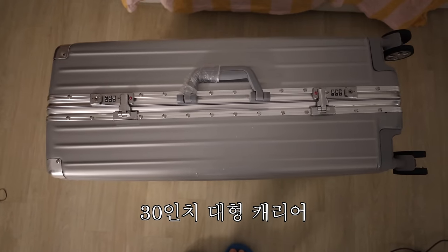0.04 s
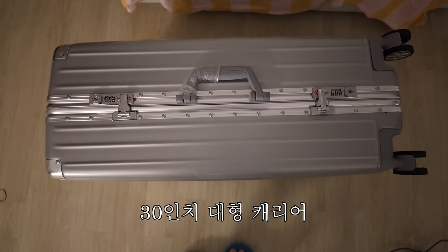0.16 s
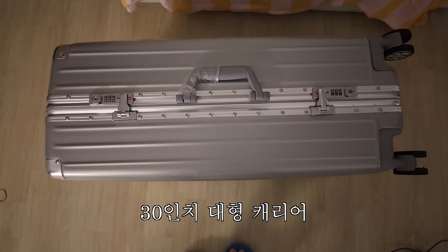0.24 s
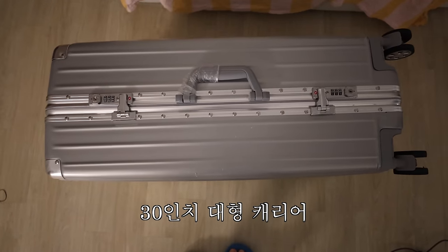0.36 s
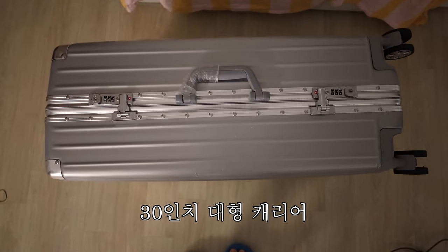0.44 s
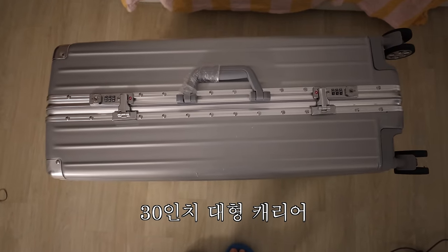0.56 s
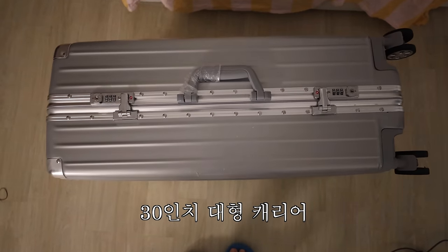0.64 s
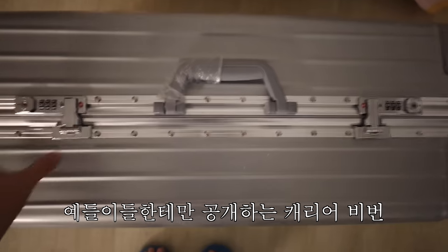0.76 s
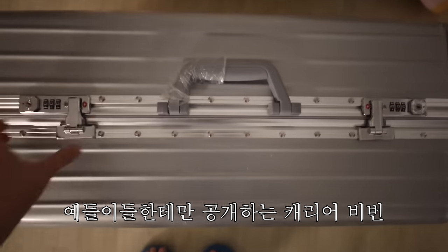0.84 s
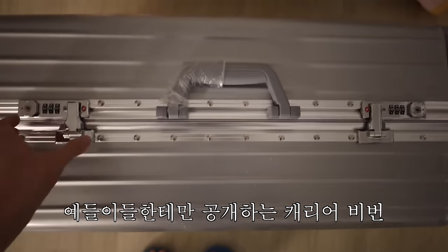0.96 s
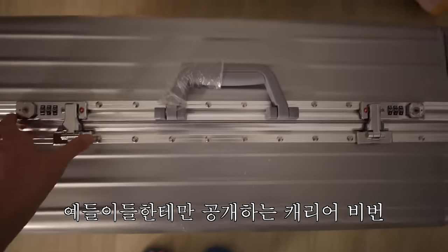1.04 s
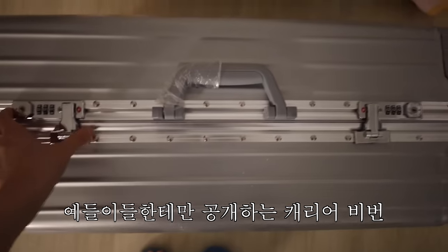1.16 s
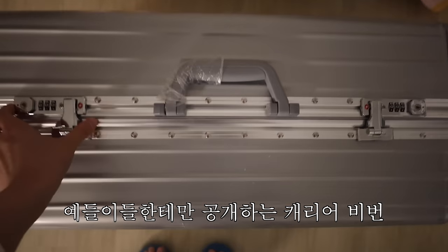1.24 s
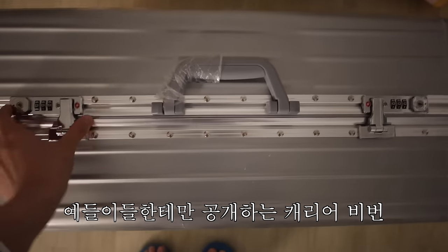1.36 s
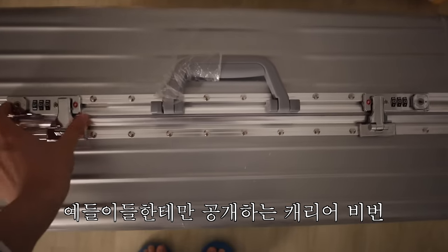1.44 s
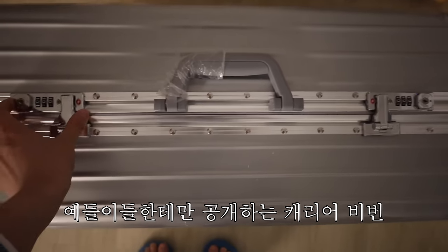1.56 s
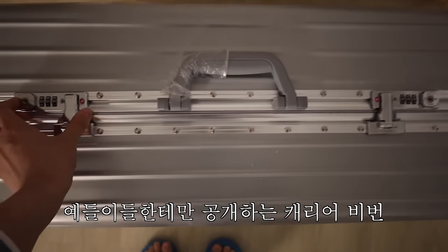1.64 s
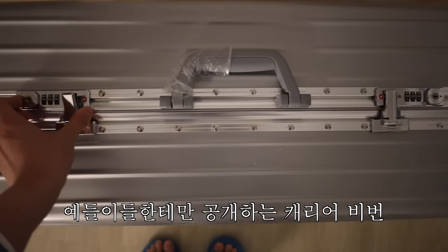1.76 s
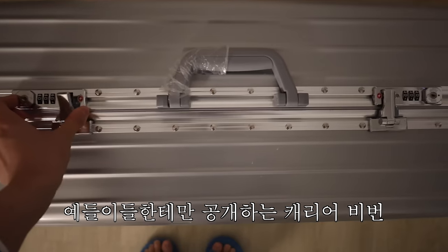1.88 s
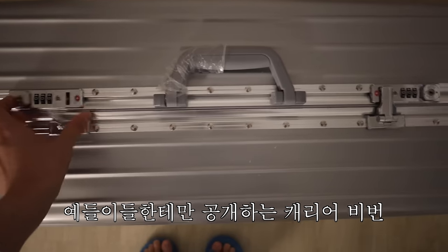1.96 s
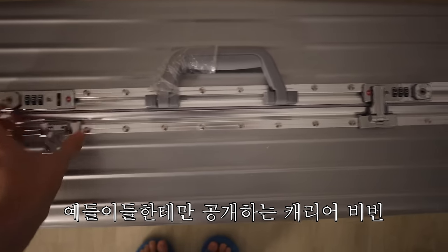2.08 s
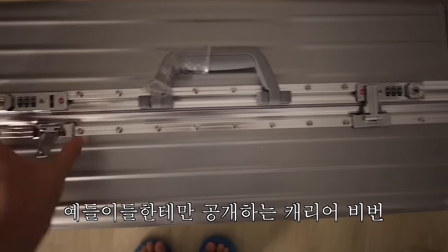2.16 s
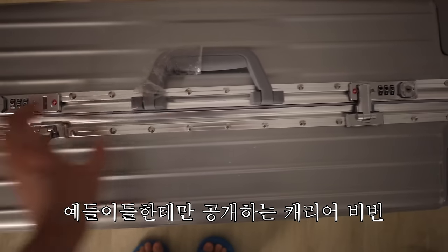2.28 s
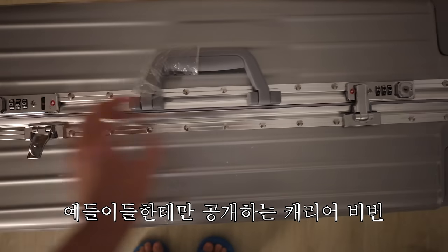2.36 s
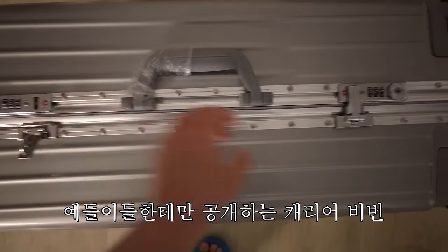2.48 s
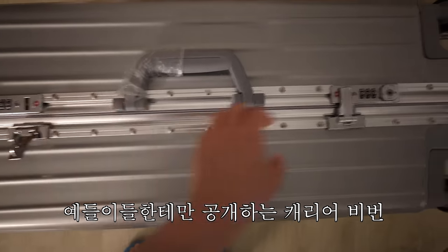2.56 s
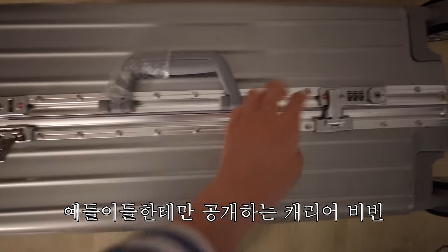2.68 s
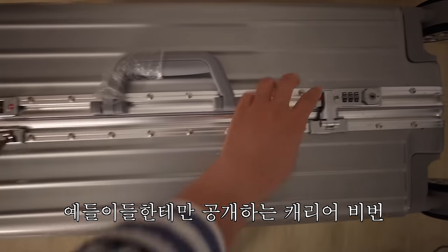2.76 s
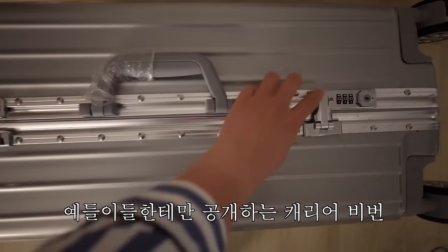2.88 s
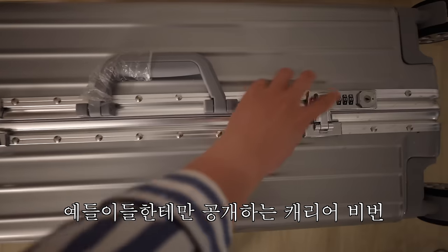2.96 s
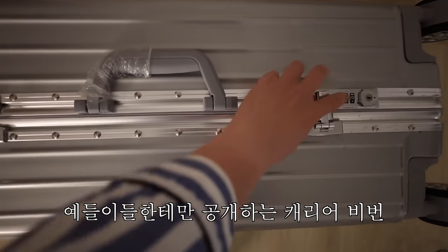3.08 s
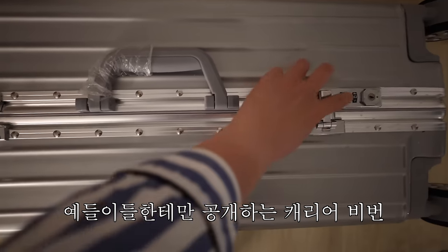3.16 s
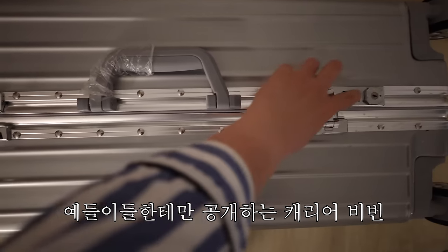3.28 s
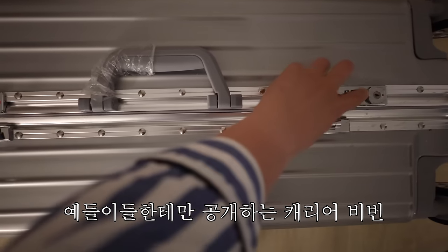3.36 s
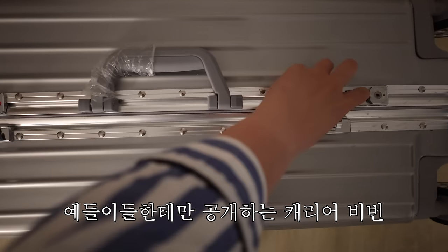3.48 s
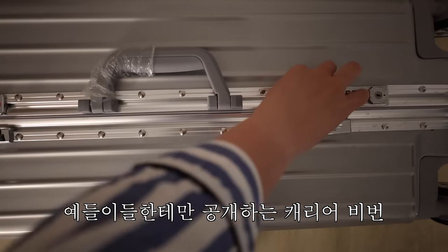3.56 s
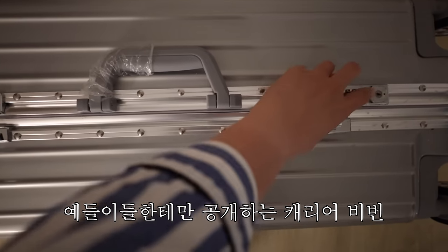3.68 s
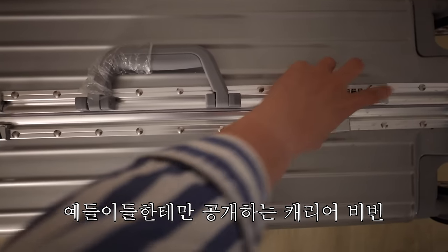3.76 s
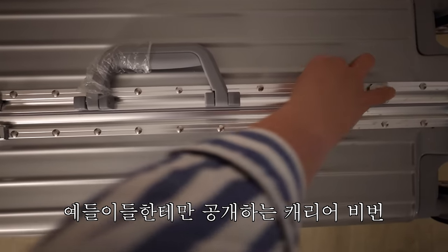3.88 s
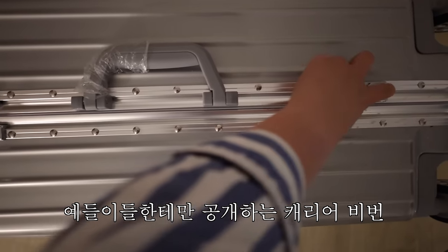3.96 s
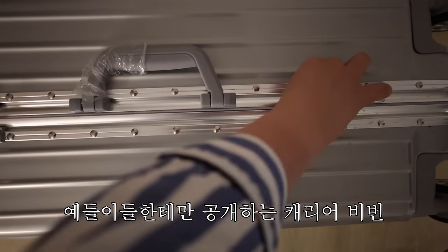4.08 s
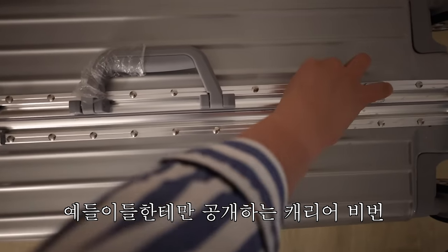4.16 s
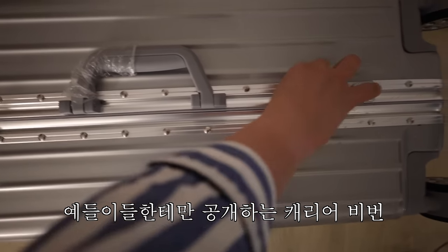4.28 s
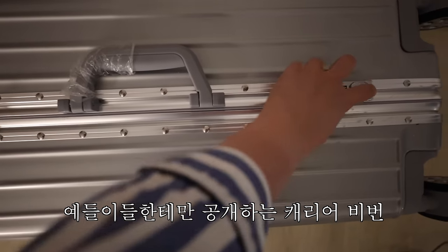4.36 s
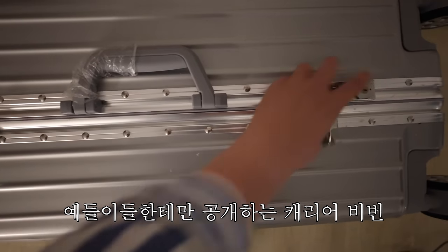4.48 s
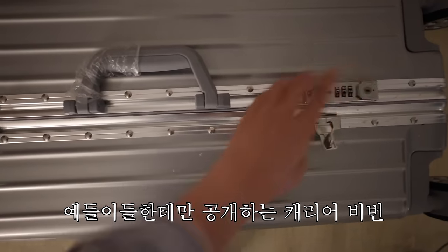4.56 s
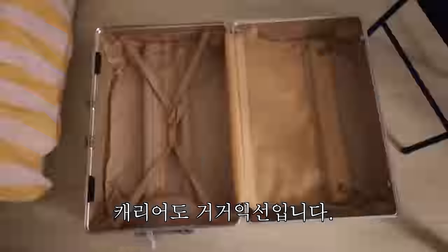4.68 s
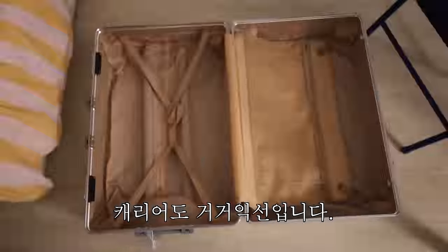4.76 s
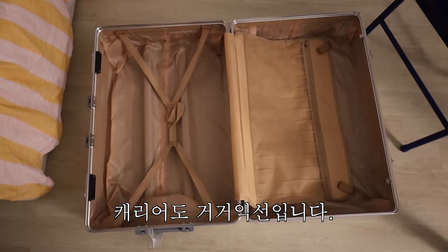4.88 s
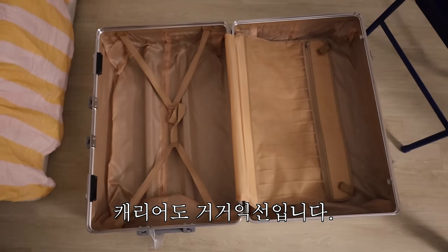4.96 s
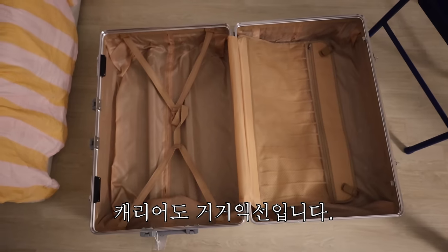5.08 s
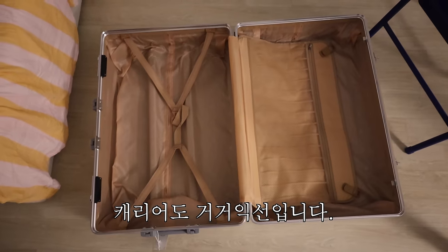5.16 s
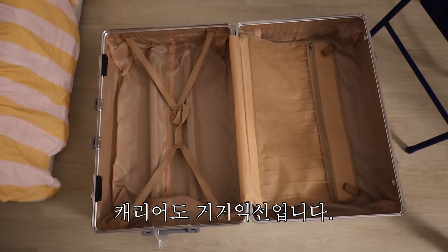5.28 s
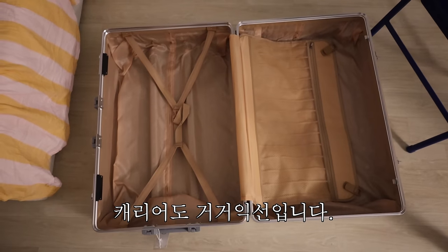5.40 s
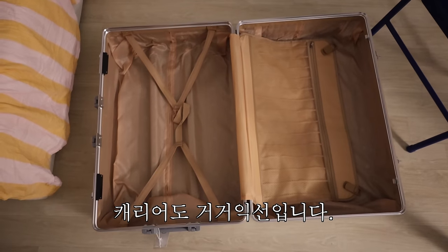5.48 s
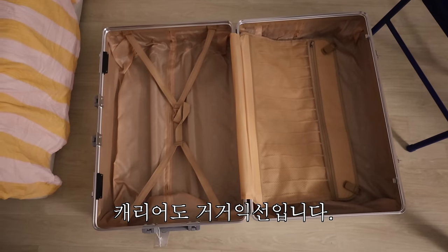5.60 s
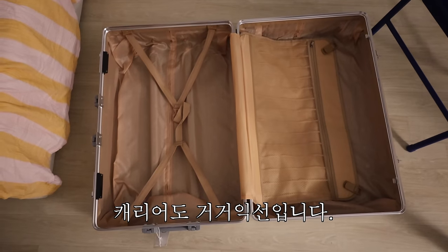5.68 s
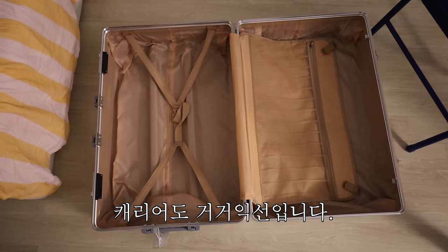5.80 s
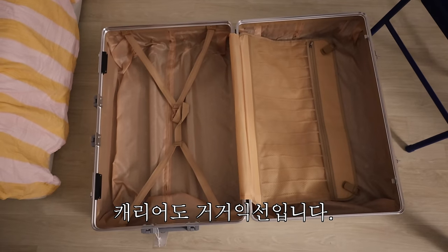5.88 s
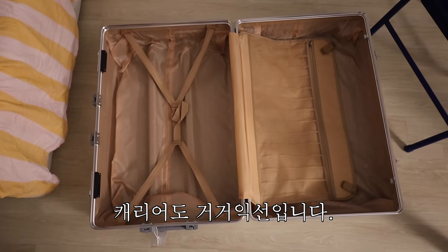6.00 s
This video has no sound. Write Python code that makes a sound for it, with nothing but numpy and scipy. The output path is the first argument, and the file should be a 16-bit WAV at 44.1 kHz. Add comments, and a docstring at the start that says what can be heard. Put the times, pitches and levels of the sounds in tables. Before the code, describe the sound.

A sharp metallic clasp crack and rattle, a pause of soft taps, then a second louder snap, booming a hollow case in a small room.

```python
"""On the floor of a small room lies a hard-shell suitcase, under a hand-held camera with two microphones.
Two sprung metal clasps open, left then right: noise cracks over ringing steel modes, then a freed lever's sine.
Filtered noise in random slips scrapes as each hook works loose; blows ring the hollow shell's damped modes.
Shaped noise gives the sleeve brushing past, the rumbling grip and the steady rush of the room.
Fingers bump the camera body in short low pulses."""
import sys
import numpy as np
from scipy import signal
from scipy.fft import rfft, irfft, next_fast_len
from scipy.io import wavfile

SR = 44100
rng = np.random.default_rng(int(sys.argv[2]) if len(sys.argv) > 2 else 0)


def log_audio(samples):
    """Write samples as a 16-bit WAV file to the path given in sys.argv[1]."""
    # one column per channel
    frames = np.atleast_2d(samples).T
    # limit to full scale, then quantise
    limited = np.clip(frames, -1, 1)
    pcm = np.round(limited * 32767).astype(np.int16)
    wavfile.write(sys.argv[1], SR, pcm)


N = 266099  # samples in the scene
RING = 32768  # samples kept of each struck sound and its echoes
AGE = np.arange(RING) / SR  # s since a sound began
TIME = np.arange(N) / SR  # s since the scene began

# likeness of the two microphones in most of the noises: (f/Hz, left-right correlation)
LIKENESS = [(100, 0.99), (350, 0.96), (700, 0.95), (1300, 0.65), (2400, 0.14), (4400, -0.11), (8000, -0.24)]


def amp(db):
    """Decibels to gain."""
    return 10 ** (np.asarray(db) / 20)


def unit(x):
    """Scale to rms 1."""
    return x / np.sqrt(np.mean(x ** 2) + 1e-20)


def along(points, hz):
    """Read (Hz, value) points on a log frequency axis."""
    f, v = np.transpose(points)
    return np.interp(np.log(hz + 1), np.log(f + 1), v)


def fade(t60, age=AGE):
    """Free decay, 60 dB in t60 seconds."""
    return np.exp(-np.log(1000) * age / np.maximum(t60, 1e-3))


def rise(seconds):
    """A contact takes a moment to build, with this time constant."""
    return 1 - np.exp(-AGE / seconds)


def filtered(x, response):
    """x times a response of frequency, padded so that the end does not wrap round."""
    n = x.shape[-1]
    m = next_fast_len(n + 4096)
    spectrum = rfft(x, m) * response(np.fft.rfftfreq(m, 1 / SR))
    return irfft(spectrum, m)[..., :n]


def noise(spectrum, likeness, size):
    """Coloured stereo noise of rms 1; mid and side are balanced to give the left-right likeness."""
    hz = np.fft.rfftfreq(size, 1 / SR)
    turn = np.arccos(np.clip(along(likeness, hz), -1, 1)) / 2
    colour = amp(along(spectrum, hz)) * np.array([np.cos(turn), np.sin(turn)])
    mid, side = irfft(rfft(rng.standard_normal((2, size))) * colour, size)
    return unit(np.array([mid + side, mid - side]))


def uneven(depth_db, rate_hz):
    """A gain that wanders between random decibel values, drawn rate_hz times a second."""
    steps = rng.standard_normal(RING)
    return amp(depth_db * np.interp(AGE * rate_hz, np.arange(RING), steps))


def ringing(modes, scatter_db, detune=0, weight=1):
    """Struck modes, at new strengths for each blow; neighbours start in opposite directions."""
    hz, db, t60 = np.transpose(modes)[:, :, None]
    loud, sharp = rng.standard_normal((2, len(hz), 1))
    sign = (-1) ** np.arange(len(hz))[:, None]
    tones = np.sin(2 * np.pi * hz * (1 + detune * sharp) * AGE)
    return np.sum(sign * weight * amp(db + scatter_db * loud) * fade(t60) * tones, axis=0)


def add(track, s, sound):
    """Mix a sound in at time s."""
    part = track[:, max(round(s * SR), 0):][:, :sound.shape[-1]]
    part += sound[..., :part.shape[1]]


def in_room(sound, wet_db, build, clump_db=2, clump_rate_hz=250):
    """A sound plus its echoes, which thicken with time constant build (s), clump and die by band."""
    # decay of the echoes: (f/Hz, t60/s)
    wall_decay = [(150, 0.74), (700, 0.47), (2500, 0.51), (6000, 0.36), (10000, 0.31), (16000, 0.11)]
    hz, t, bands = signal.stft(noise([(1, 0)], LIKENESS, size=RING), SR, nperseg=256)
    dying = bands * fade(along(wall_decay, hz)[:, None], t)
    tail = signal.istft(dying, SR, nperseg=256)[1][:, :RING]
    tail = unit(tail * uneven(clump_db, clump_rate_hz) * rise(build)) / np.sqrt(RING)
    return sound + amp(wet_db) * signal.fftconvolve(sound[:1], tail, axes=1)[:, :RING]


def room_tone(tone_db=-49.5):
    """The steady rush of the room is coloured noise."""
    # colour of the quiet room: (f/Hz, relative level/dB)
    tone_spectrum = [(15, -33), (25, -20.5), (55, -18), (117, -15.5), (170, -10), (256, 0), (451, -7),
                     (607, -4), (1020, -8), (1130, -12), (2110, -17), (2610, -23.5), (3720, -23.5),
                     (8360, -36), (16000, -35.5)]
    # its likeness at the microphones: (f/Hz, left-right correlation)
    tone_likeness = [(60, 0.84), (130, 0.92), (290, 0.93), (640, 0.83), (1410, 0.48), (3100, -0.27),
                     (6820, 0.0088), (15000, -0.062)]
    return amp(tone_db) * noise(tone_spectrum, tone_likeness, size=N)


def sleeve(resting_db=-77):
    """Cloth hisses with the speed of the arm, which swells and dies in each stroke."""
    # strokes as the arm reaches over the case:
    # (middle t/s, length/s, level at the middle/dB, added to the resting hiss)
    strokes = [(0.99, 0.96, -63), (2.695, 0.63, -61), (3.032, 0.37, -61.5), (3.9, .6, -78)]
    # colour of the cloth: (f/Hz, relative level/dB)
    cloth_spectrum = [(300, -10.5), (1000, 5), (4000, -4), (8000, -6.5), (16000, -12)]
    speed = np.zeros(N)
    for s, length, db in strokes:
        phase = np.clip((TIME - s) / length, -.5, .5)
        speed += amp(db) * np.cos(np.pi * phase) ** 2
    return (amp(resting_db) + speed) * noise(cloth_spectrum, LIKENESS, size=N)


def camera(bump_hz=150, bump_db=2, width=0.0041):
    """The hand rumbles on the camera, more while it shifts; bumps go through the body, dull, without echo."""
    # the hand shifts its grip: (start t/s, end t/s, added rumble level/dB)
    regrips = [(0.0, 0.18, -40), (0.58, 0.739, -48)]
    # fingers knocking on the body as they shift: (t/s, relative level/dB)
    bumps = [(0.061, -37), (0.094, -38.5), (0.127, -31.5), (0.158, -34.5), (0.175, -28.5), (0.524, -47),
             (0.637, -37), (0.686, -46)]
    # colour of the rumble: (f/Hz, relative level/dB)
    grip_spectrum = [(20, 4), (60, -3), (110, 5), (200, -1.5), (350, -13.5), (900, -52.5)]
    attack_s, release_s, resting_grip_db = 0.1, .03, -60.5  # time constants either side of a shift
    bump_pan_db = -22  # left over right: the fingers are next to the right microphone
    grip = amp(resting_grip_db)
    for start, end, db in regrips:
        before = np.maximum(start - TIME, 0) / attack_s
        after = np.maximum(TIME - end, 0) / release_s
        grip = grip + amp(db) * np.exp(-before - after)
    out = grip * noise(grip_spectrum, [(30, 0.57), (150, 0.61)], size=N)
    t = AGE - 2 * width
    for s, db in bumps:
        pitch = bump_hz * np.exp(0.17 * rng.standard_normal())
        thud = np.sin(2 * np.pi * pitch * t) * np.exp(-(t / width) ** 2)
        tap = amp(-6) * np.sin(2 * np.pi * 340 * t) * np.exp(-(t / 0.0014) ** 2)
        pan_db = np.array([[.5], [-.5]]) * bump_pan_db
        add(out, s - 1.7 * width, amp(db + bump_db + pan_db) * (thud + tap))
    return out


def shell(boom_db=-7, clack_db=7, frame_db=-5.5, spot_octaves=0.47):
    """A blow clacks on the frame and rings the panels, most of all those near the struck spot's pitch."""
    # blows that reach the shell: (t/s, relative boom level/dB, relative clack level/dB, favoured f/Hz)
    knocks = [(1.12, -41, -40.5, 180), (1.748, -13, -29, 125), (2.034, -15.5, -24.5, 260),
              (2.132, -13.5, -31, 193), (2.188, -19, -43.5, 155), (2.893, -19, -33, 240),
              (3.404, -28, -52, 115), (4.021, -26, -34.5, 200), (4.241, -11, -31.5, 150),
              (4.255, -12.5, -19.5, 170), (4.557, -19, -28, 384), (4.676, -25.5, -40, 109)]
    # panels and air of the shell: (f/Hz, relative level/dB, t60/s)
    shell_modes = [(97.6, -1, 0.19), (108.2, 3, 0.15), (135.9, -7, 0.67), (151.8, -4, 0.22),
                   (193.6, 2.5, 0.31), (255.2, -1.5, 0.3), (322.3, -14, 0.37), (390, -2, 0.25),
                   (423, -10.5, 0.16), (526, -13, 0.25)]
    # aluminium frame round the rim: (centre f/Hz, relative level/dB, t60/s)
    frame_modes = [(646, -18, 0.05), (772, -4.5, 0.096), (863, -6, 0.16), (898, -1.5, 0.024),
                   (1028, -13, 0.099), (1100, 4, 0.095)]
    # colour of the clack: (f/Hz, relative level/dB)
    clack_spectrum = [(60, -20), (130, 6.5), (400, -2), (560, -4), (850, -1.5), (1200, -14), (2200, -22),
                      (6000, -41)]
    out = np.zeros((2, N))
    panel_hz = np.array(shell_modes)[:, :1]
    for s, db, hard_db, spot_hz in knocks:
        nearness = 1 / np.hypot(1, np.log2(panel_hz / spot_hz) / spot_octaves)
        panels = ringing(shell_modes, scatter_db=1, weight=nearness)
        boom = amp(db + boom_db) * panels * rise(0.0039)
        rim = amp(frame_db) * ringing(frame_modes, scatter_db=4.0, detune=.015)
        clack = amp(clack_db) * noise(clack_spectrum, LIKENESS, size=RING) * fade(0.062) * rise(0.0025)
        add(out, s, in_room(boom[None], wet_db=-15, build=.012))
        add(out, s, amp(hard_db) * (rim + in_room(clack, wet_db=-0.5, build=0.0053)))
    return out


def levers(lever_hz=9500, lever_t60_s=.09):
    """The freed lever lands against its stop and sings briefly on one high note."""
    # landings: (t/s, level at the start/dB)
    pings = [(2.038, -50), (2.126, -41), (4.451, -49), (4.559, -37)]
    out = np.zeros((2, N))
    for s, db in pings:
        add(out, s, amp(db) * np.sin(2 * np.pi * lever_hz * AGE) * fade(lever_t60_s))
    return out


def clasp_colour(s):
    """The spectrum of the left clasp early on, of the right clasp later."""
    # cracks of the two clasps: (f/Hz, relative level/dB)
    crack_left = [(200, -36.5), (550, -1), (900, -0.5), (1400, -2), (2300, -2), (3900, -1.5), (5000, -8.5),
                  (7500, -5), (10000, -11), (13500, -10), (16000, -10)]
    crack_right = [(200, -32.5), (550, -9), (900, -1.5), (2200, 0), (3000, -2), (4000, -5.5), (5000, -3.5),
                   (7000, -2.5), (9600, -5), (12000, -10.5), (16000, -10.5)]
    crossing_s = 2.5  # the hand crosses from the left clasp to the right
    return crack_left if s < crossing_s else crack_right


def scrapes(grain_db=5, grain_rate_hz=350, dull_hz=4500):
    """Metal slides on metal in small random slips, swelling and dying with each pull."""
    # the hook scrapes along its keeper as it works loose: (start t/s, length/s, relative level/dB)
    pulls = [(1.981, 0.13, -45.5), (2.087, 0.14, -42), (4.366, 0.15, -41)]
    out = np.zeros((2, N))
    for s, length, db in pulls:
        slips = noise(clasp_colour(s), LIKENESS, size=RING) * uneven(grain_db, grain_rate_hz)
        grit = filtered(slips, lambda f: 1 / np.hypot(1, f / dull_hz))
        pull = np.sin(np.pi * np.minimum(AGE / length, 1))
        add(out, s, amp(db) * unit(grit) * pull)
    return out


def contact(s, db, bright_db, pan_db, t60, crack_db=2, steel_db=-15, hinge_hz=5000):
    """A short crack, which fills the room, and a ring of steel; bright_db lifts or dulls the treble."""
    # hook, spring and housing of a clasp: (centre f/Hz, relative level/dB, t60/s)
    steel_modes = [(1330, -0.5, 0.033), (1678, -8.5, 0.032), (2087, -2.5, 0.054), (2485, -5.5, 0.033),
                   (3146, -10, 0.017), (3850, -10, 0.045), (4100, -12, 0.022), (6905, -4, 0.019),
                   (9800, -8, .015), (14300, -15.5, .015)]
    crack_likeness = [(500, 0.83), (2000, 0.23), (8000, 0.73)]
    port_lag = 0.017 / 343  # s of travel over the 17 mm between the two microphones
    side = np.array([[.5], [-.5]])
    ring = amp(steel_db) * ringing(steel_modes, scatter_db=-2.5, detune=0.015)
    crack = amp(crack_db) * noise(clasp_colour(s), crack_likeness, size=RING)
    crack = crack * fade(t60) * rise(0.00073)
    echoes = in_room(crack, wet_db=-5.0, build=0.00297) - crack
    # the nearer microphone gets the click sooner, and its treble louder
    lead = side * port_lag * np.sign(pan_db)

    def at_microphones(f):
        return amp(side * pan_db * f / (f + 2500)) * np.exp(2j * np.pi * f * lead)

    direct = filtered(crack + ring, at_microphones)
    return filtered(direct + echoes, lambda f: amp(db + bright_db * f ** 2 / (f ** 2 + hinge_hz ** 2)))


def clasps():
    """Hard clicks of catch, hook and lever, each a struck contact, and soft dull taps made the same way."""
    # metal striking metal as catches spring, hooks come off and levers drop:
    # (t/s, relative level/dB, treble/dB, left over right in the treble/dB)
    clicks = [(1.746, -4.5, 1.5, 12.5), (1.7487, -4.5, 0.5, 4), (2.029, -22.5, -10, -5),
              (2.037, -23, 1, 8.5), (2.126, -34, 9, 23), (2.131, -22, 8, 6), (2.145, -32, 6.5, 30),
              (2.187, -29.5, -13, 23), (4.2399, -1, 3, -1), (4.2541, -3.5, -4.5, -9), (4.454, -21, -8, 12),
              (4.467, -9.5, -13.5, -14.5), (4.559, -25, 4.5, -4)]
    # light dull taps, the first of them a tick from the camera: (t/s, relative level/dB)
    taps = [(0.177, -39), (1.118, -39), (1.58, -35.5), (2.893, -25), (3.011, -38), (3.208, -36.5),
            (3.275, -32), (3.401, -36), (4.02, -32), (4.676, -41)]
    out = np.zeros((2, N))
    for s, db, bright_db, pan_db in clicks:
        add(out, s, contact(s, db, bright_db, pan_db, t60=0.013))
    for s, db in taps:
        # these are softer, duller contacts than the clicks
        add(out, s, contact(s, db, bright_db=-18.5, pan_db=-6, t60=0.015))
    return out


def scene():
    """The suitcase, faded out by an edit just after the last knock, over the quiet room."""
    cut_s, cut_fade_s = 4.712, .012
    cut = np.clip(1 - (TIME - cut_s) / cut_fade_s, 0, 1)
    suitcase = clasps() + scrapes() + levers() + shell()
    return suitcase * cut + camera() + sleeve() + room_tone()


def record(dry, low_cut_hz=55, top_hz=16100):
    """The camera thins the deep bass, clips at full scale and cuts steeply above its band limit."""
    high_pass = signal.butter(2, low_cut_hz, "highpass", fs=SR, output="sos")
    thin = signal.sosfilt(high_pass, dry)
    return filtered(np.clip(thin, -1, 1), lambda hz: 1 / (1 + (hz / top_hz) ** 120))


dry = scene()
out = record(dry)
log_audio(out)
```